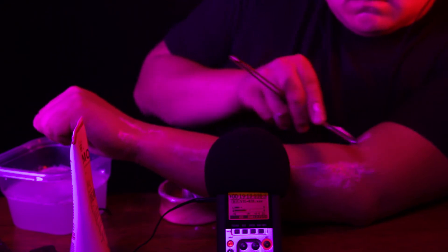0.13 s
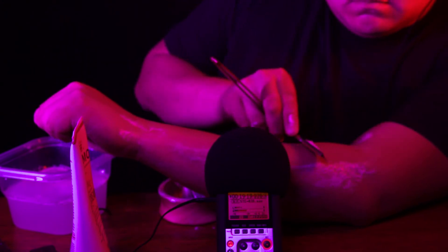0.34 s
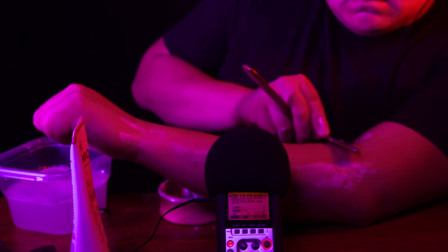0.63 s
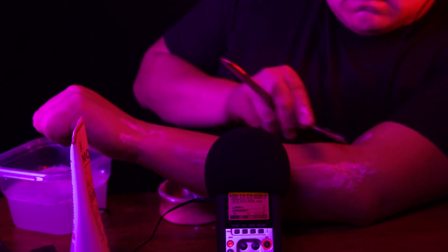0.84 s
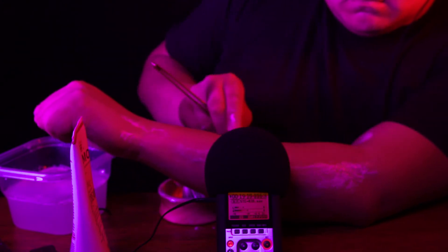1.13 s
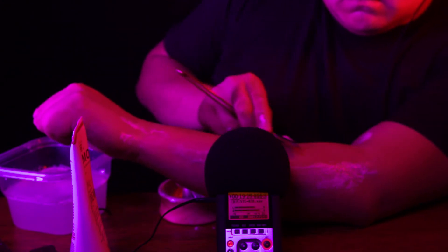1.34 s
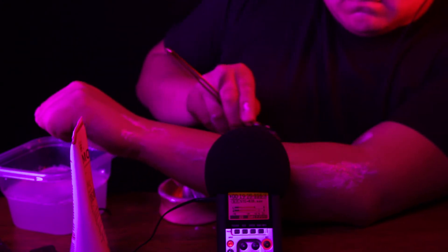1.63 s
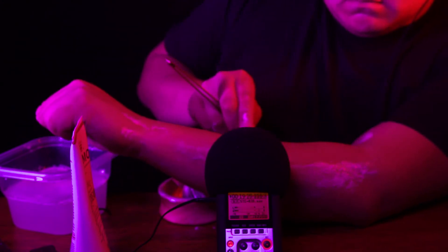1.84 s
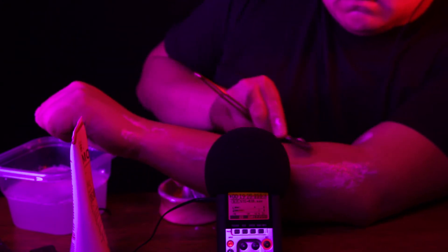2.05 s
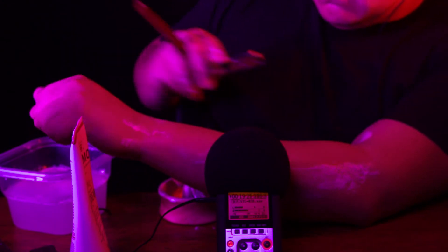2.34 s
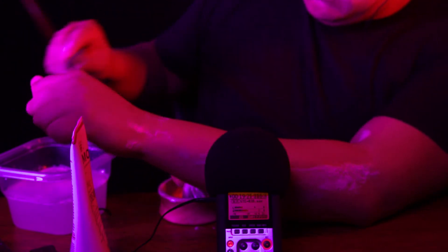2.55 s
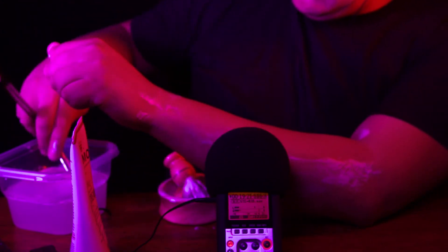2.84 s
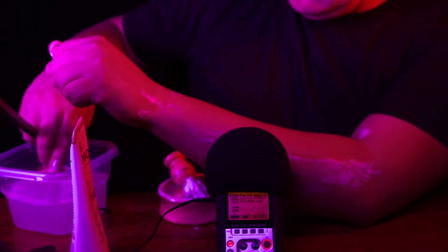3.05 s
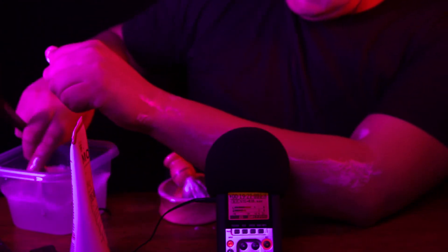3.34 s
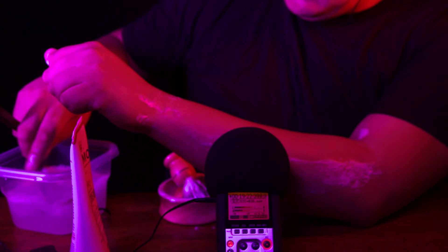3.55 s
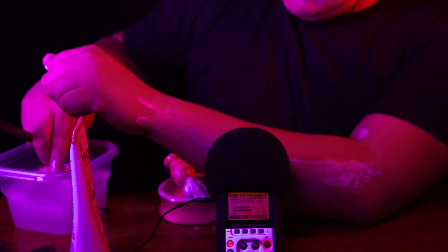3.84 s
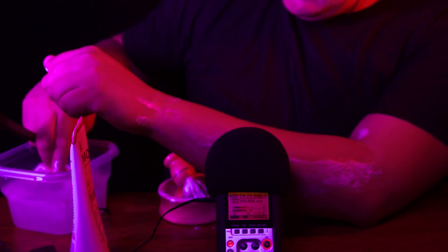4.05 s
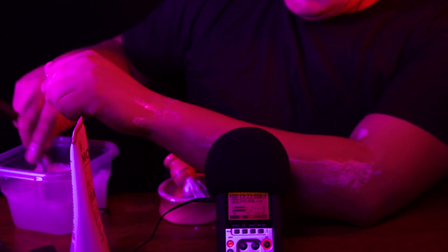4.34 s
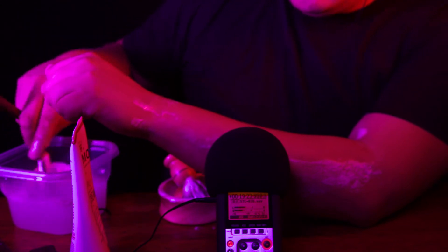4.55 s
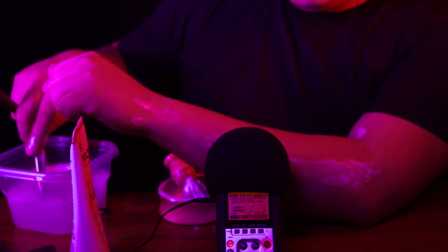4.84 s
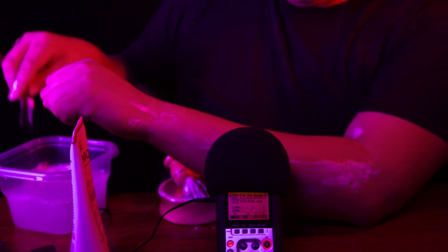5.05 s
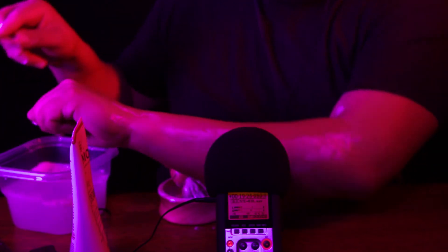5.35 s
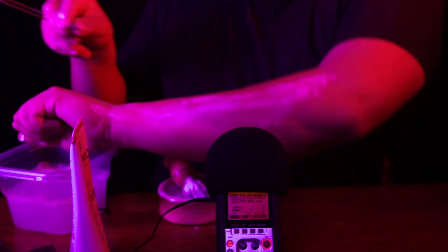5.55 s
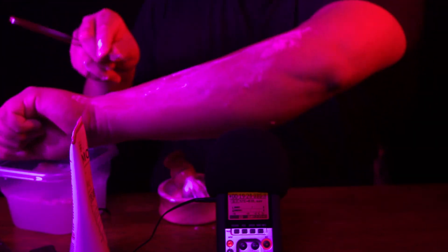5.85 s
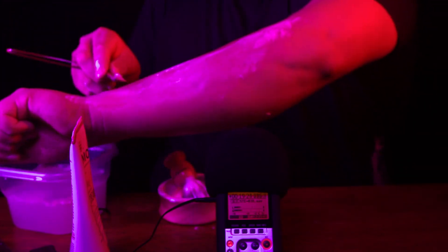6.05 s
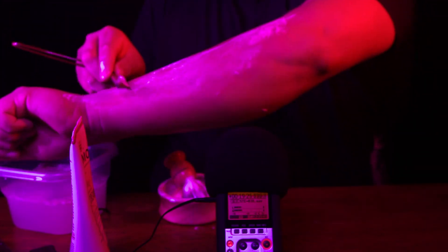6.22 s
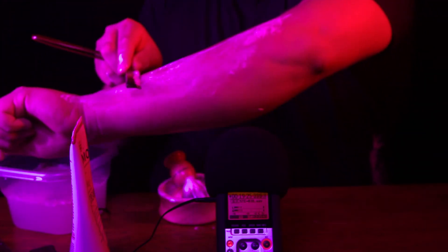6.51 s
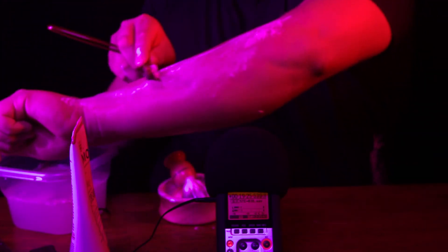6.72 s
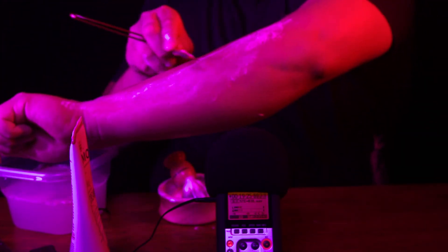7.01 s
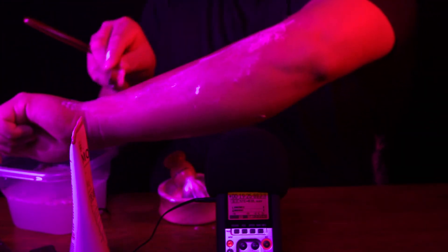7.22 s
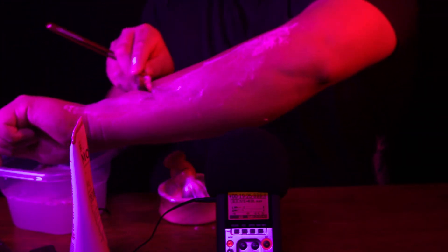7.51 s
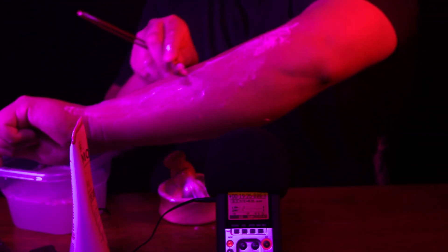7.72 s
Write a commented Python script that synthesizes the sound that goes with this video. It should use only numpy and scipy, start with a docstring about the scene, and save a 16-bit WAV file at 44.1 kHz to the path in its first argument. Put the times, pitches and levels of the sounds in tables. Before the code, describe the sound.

A quiet room with faint low rumble and hum, heard very close in wide stereo. A clipped razor rasp opens at 0 s on the right; fuller crisp strokes follow around 0.5-0.8 s, with sharp hair snaps. At 1.1 s a hand bumps the recorder: a fluttering low thud with dull foam rubbing, lasting about 0.15 s, then a short scrape at 1.25. Two strokes crackle at 1.9-2.1. A faint rub and soft handle scuff fill 2.3-2.75. From 3.05 the blade is rinsed in a tub at left: deep rising plops, splashes and spray, strongest at 3.05 and 3.4-3.6, with hollow table thumps. Smaller blips continue to 4.65, dwindling to drips by 5.2. Soft handle taps come at 5.27, 5.55, 5.98 and 6.2. Thin, bright scrapes resume left at 6.45, swelling near 6.9; a small tap at 6.99, a pause, then quick strokes from 7.43 to 7.9.

```python
"""On a wooden table in a quiet, low-humming room, a straight razor shaves a forearm beside a stereo recorder.
Cut hairs are random impulses and skin drag is filtered noise, both under contact envelopes. A hand bumps the
recorder, ringing its body modes. The blade is rinsed in a plastic tub on the left: bubbles are rising sines,
splashes are bands of noise, and thumps ring table modes. Fingers rub and shift the handle with short noises."""
import sys
import numpy as np
from scipy import signal
from scipy.fft import rfft, irfft, next_fast_len
from scipy.io import wavfile

SR = 44100
rng = np.random.default_rng(int(sys.argv[2]) if len(sys.argv) > 2 else 0)


def bounce(signal):
    """Save signal as a 16-bit WAV file at the path given by the first command-line argument."""
    frames = np.transpose(np.atleast_2d(signal))
    limited = np.clip(frames, -1, 1)
    pcm = np.round(limited * 32767).astype(np.int16)
    wavfile.write(sys.argv[1], SR, pcm)


N = 347508
TIME = np.arange(N) / SR

# Background noise spectrum. Each row: frequency in Hz, relative level in dB.
AIR_SPECTRUM = [(12, -56.5), (20, -27.5), (44, -4), (65, 0), (91, -18.5), (163, -12), (293, -26),
                (319, -31.5), (367, -30.5), (422, -33.5), (472, -33.5), (759, -44.5), (825, -33),
                (976, -53), (16000, -67)]
AIR_DB = -52
# Stereo correlation of the background. Each row: frequency in Hz, left-right likeness from -1 to 1.
AIR_LIKENESS = [(60, 0.046), (180, 0.28), (550, 0.24), (1650, 0.14), (4970, 0.053), (15000, 0.04)]
# Stereo balance of the background. Each row: frequency in Hz, left minus right in dB.
AIR_BALANCE = [(60, -3.5), (180, -1.5), (550, 0.5), (1650, -1.5), (4970, 0), (15000, 0.5)]
# Hum lines. Each row: centre in Hz on an axis shifted up by 1 Hz, width in Hz, level in dB, left-right likeness.
HUM_LINES = [(59.5, 8, -59, -.8), (119, 6, -70, .3), (156, 14, -68, .5), (808, 25, -87, -.6)]

# Bands of the room tail. Each row: centre in Hz, 60 dB decay time in seconds, level in dB.
ROOM_BANDS = [(298, 0.32, -6), (900, 0.32, -21), (2500, 0.14, -16), (6000, 0.2, -28.5), (12350, 0.3, -14.5)]
NEAR_T60_S, NEAR_DB = .008, -6   # close reflections from arm and table
TUB_T60_S, TUB_DB = 0.13, -7.5   # reflections from the tub walls
TUB_PAN_DB, PAN_DB_PER_OCTAVE = 7, 3   # left minus right at 1 kHz, and its growth with frequency
CUTOFF_HZ = 16150

# Sliding contact: loss in dB at the start, at the end, and the added drop at both ends
SWELL_DB, SAG_DB, EDGE_DB = 12, 13, 39
LAND_POWER, LIFT_POWER = 8.6, 3.88   # how abruptly it lands and lifts

# The tub thumps the table. Each row: start in seconds, strength in dB.
THUMPS = [(3.419, -15), (3.590, -11.5), (3.697, -28.5), (3.874, -45.5), (4.111, -22.5), (4.636, -34.5),
          (5.974, -38.5)]
# Table modes, the two board modes first. Each row: frequency in Hz, relative level in dB, 60 dB decay in seconds.
TABLE_MODES = [(190.5, 5, 0.14), (202.3, 2.5, 0.091), (83.4, -20, 0.36), (285, -17, 0.096),
               (396, -16, 0.062), (495.3, -20, .05)]
THUMP_DELAY_S = 0.012   # the board answers a little after the tub floor
BUZZ_HZ, BUZZ_T60_S, BUZZ_DB = 458.6, 0.42, -39.5   # rough shudder of the tub after each thump

# Jolts to the recorder. Each row: start in seconds, left strength in dB, right strength in dB.
JOLTS = [(1.113, -19, 3.5), (1.121, 1.5, -31), (1.133, -29, 0.5), (1.147, -10.5, -9), (1.172, -9.5, -7.5),
         (1.187, -3, -6), (1.196, -8.5, -7), (1.215, -12, -21.5)]
# Recorder body modes. Each row: frequency in Hz, relative level in dB, 60 dB decay in seconds.
BODY_MODES = [(182.4, -1, 0.099), (126.1, -8, 0.15), (69.2, -10.5, 0.11), (373, -34.5, 0.061),
              (517, -29, .05)]
# The recorder rocks on its foot: start in seconds, frequency in Hz, 60 dB decay in seconds,
# left strength in dB, right strength in dB.
ROCK = (1.108, 35, .2, -15, -7)
# Hand on the foam cover. Each row: start, rise and fall in seconds, level in dB,
# scratch relative to the dull rub in dB, left minus right in dB.
RUBS = [(1.11, .006, 0.054, -21, -21, -2.5), (1.139, 0.069, 0.037, -26.5, -18, -6.5)]
# Spectrum of the dull rub. Each row: frequency in Hz, relative level in dB.
RUB_SPECTRUM = [(140, -32), (230, -5.5), (343, -8.5), (397, -6), (495, -17), (538, -14), (1200, -50),
                (1560, -69), (2640, -120)]
# Spectrum of the scratch. Each row: frequency in Hz, relative level in dB.
SCRATCH_SPECTRUM = [(530, -23.5), (900, -2), (1500, -12), (1870, -14), (2090, -9.5), (4000, -41.5),
                    (5200, -73), (8800, -120)]
# Thin rustle of the cover: start, rise and fall in seconds, level in dB, left minus right in dB.
RUSTLE = (1.106, .012, .12, -68, -20)

# Soft rubs of fingers and sleeve. Each row: start, rise and fall in seconds, level in dB,
# squeak relative to the dull part in dB, left minus right in dB.
SLIDES = [(0.239, 0.092, 0.024, -82, -12, -5), (2.298, 0.22, 0.079, -77.5, -22.5, -6.5),
          (5.955, 0.051, 0.081, -73, -2, 23.5), (6.329, 0.041, 0.09, -80, -5, 19)]

# The handle shifts in the fingers. Each row: start in seconds, level in dB, centre in Hz, length in seconds,
# bright tick relative in dB, left minus right in dB.
TAPS = [(2.709, -52, 1300, 0.052, -43, 1), (5.266, -60.5, 1290, .025, -4.5, -16.5),
        (5.554, -47.5, 1064, 0.055, -39.5, 3.5), (5.976, -61, 1830, 0.03, -14, 18),
        (6.207, -51.5, 1904, 0.066, -27.5, 3), (6.99, -60.5, 900, 0.015, -34, -3)]
# Handle modes. Each row: frequency in Hz, relative level in dB, 60 dB decay in seconds.
HANDLE_MODES = [(900, 3.5, 0.0073), (1360, 2.5, 0.0067), (2120, -9, 0.035), (2940, 0.5, 0.012),
                (4060, -0.5, 0.013)]
HANDLE_CUT_HZ = 3300   # fingers damp the handle above this

# Bubbles and drops. Each row: start in seconds, level in dB, start pitch in Hz, 60 dB decay in seconds,
# initial rise in octaves per second.
BUBBLES = [(2.990, -68.5, 1880, 0.067, 3), (3.055, -16.5, 903, 0.079, 24), (3.070, -29, 1126, 0.045, 10.6),
           (3.127, -34.5, 767, 0.052, 4.4), (3.169, -43, 984, .16, 6.3), (3.301, -56, 1145, 0.067, 2),
           (3.325, -37.5, 943, 0.068, 45), (3.357, -56, 3870, 0.026, 4.6), (3.362, -35.5, 1140, 0.02, 3.6),
           (3.363, -50.5, 1826, 0.089, 1.9), (3.435, -14, 802, 0.061, 33), (3.46, -38.5, 1840, 0.14, 1.5),
           (3.47, -28.5, 1250, 0.03, 4.9), (3.497, -52, 3056, 0.098, 2.4), (3.568, -30, 4500, 0.011, 3.3),
           (3.588, -23.5, 1026, 0.033, 3), (3.845, -53.5, 3670, 0.05, 1.3), (3.846, -56, 1460, 0.15, 3.2),
           (3.948, -26, 693, 0.026, 2), (3.95, -36.5, 2500, 0.042, 4.1), (3.966, -42, 780, 0.064, 25),
           (4.029, -37, 990, 0.037, 28), (4.112, -33, 1923, 0.028, 1.5), (4.149, -36.5, 1035, 0.059, 10),
           (4.224, -52.5, 3570, 0.028, 1.3), (4.238, -29, 838, 0.099, 10), (4.369, -59, 6100, .02, 1.5),
           (4.637, -45, 3140, 0.033, 3), (4.644, -32, 1064, 0.039, 32), (4.657, -37.5, 1376, 0.067, 4.5),
           (4.801, -41, 2526, 0.026, 1.8), (4.804, -55, 1546, 0.084, 1.13), (4.842, -50, 3820, 0.024, 4.6),
           (4.922, -58, 1575, 0.089, 1.75), (4.996, -54, 5070, 0.026, 2.1), (5.032, -55, 2195, 0.035, 2.5),
           (5.060, -58, 5380, 0.025, 3.4), (5.170, -50.5, 1314, 0.045, 1.4)]
WOBBLE = .06   # rms share by which a bubble's pitch comes to tremble in moving water
# Splashes. Each row: start in seconds, crack level in dB, crack centre in Hz, spray level in dB, spray centre in Hz.
SPLASHES = [(3.055, -44.5, 2280, -47.5, 8080), (3.124, -41, 2650, -48.5, 5890),
            (3.151, -57, 2970, -64, 7680), (3.172, -54, 2850, -80, 6400), (3.205, -49, 3650, -54, 6590),
            (3.249, -67, 2980, -54.5, 10450), (3.309, -82, 2390, -76, 7080), (3.325, -61, 2550, -75, 7530),
            (3.36, -69, 1780, -90, 5850), (3.417, -33, 1050, -46.5, 6590), (3.476, -52, 1760, -59, 8690),
            (3.525, -65, 2760, -57, 11410), (3.586, -29, 1274, -38, 5780), (3.614, -73, 2200, -48.5, 8170),
            (3.665, -78, 2340, -67, 6670), (3.695, -38.5, 1760, -50.5, 5860),
            (3.715, -59.5, 2940, -47.5, 9100), (3.743, -78, 2400, -62.5, 7890),
            (3.812, -49, 2070, -72, 8630), (3.847, -67, 2800, -91, 7570), (3.871, -60.5, 2480, -79, 10300),
            (3.951, -49.5, 2430, -74, 5750), (3.98, -51, 2540, -69, 5520), (4.02, -57, 2800, -60.5, 4710),
            (4.028, -44.5, 1846, -69, 5500), (4.11, -40.5, 1900, -53.5, 6200),
            (4.224, -65, 2810, -81, 5190), (4.237, -56.5, 1870, -73, 6200), (4.62, -59.5, 650, -95.5, 8660),
            (4.638, -57, 3430, -65, 8640), (4.798, -57, 2480, -67.5, 6850),
            (4.852, -62.5, 3860, -70.5, 5580), (4.919, -67, 2410, -55.5, 8140),
            (4.986, -88, 2380, -60.5, 12930), (5.032, -80, 2290, -74.5, 7840),
            (5.169, -66.5, 1312, -89.5, 6920)]
# Spectrum of the crack. Each row: frequency in Hz, relative level in dB.
CRACK_SPECTRUM = [(300, -15), (700, 14.5), (1500, 1), (4000, 0.5), (6000, -33), (12000, -52)]
# Spectrum of the bright spray. Each row: frequency in Hz, relative level in dB.
SPRAY_SPECTRUM = [(2000, -48), (4000, 1), (6500, -3.5), (10000, -6.5), (16000, -3)]
SPLASH_ATTACK_S, SPLASH_T60_S = .0012, .042
DROPLETS, DROPLET_DB = 10, -3.5   # pairs of tiny bubbles per splash, and their greatest level relative to it

# Razor strokes. Each row: start, rise and fall in seconds, stubble level in dB,
# skin drag relative to the stubble in dB, left minus right in dB.
STROKES = [(0.0, 0.0014, 0.053, -44.5, -7, -12.5), (.335, .015, 0.039, -86.5, -14, -19),
           (0.479, 0.092, 0.051, -47.5, -8, -15), (0.583, 0.069, 0.15, -44.5, -5.5, -13),
           (0.798, 0.037, 0.02, -72, -1, -23), (1.222, 0.052, 0.052, -47, -12, -6),
           (1.89, 0.039, 0.18, -45, -10, -8.5), (1.986, 0.13, 0.077, -39.5, -11, -13),
           (6.44, 0.029, 0.045, -60, -12.5, 13.5), (6.525, 0.029, 0.047, -83, -0.5, 8.5),
           (6.638, 0.053, 0.046, -60.5, -28.5, 11.5), (6.754, .04, .05, -59.5, -26, 12.5),
           (6.843, 0.055, 0.075, -53.5, -25, 8.5), (6.919, 0.08, 0.057, -42.5, -35.5, 3),
           (7.43, 0.026, 0.02, -62.5, -30.5, 18), (7.46, 0.035, 0.087, -62.5, -28.5, 18.5),
           (7.586, 0.032, 0.047, -70.5, -24.5, 16.5), (7.631, 0.053, 0.053, -51.5, -24, 10.5),
           (7.7, 0.059, 0.085, -55.5, -26.5, 9.5), (7.77, .1, .06, -47.5, -27.5, 6)]
# Spectrum of cut stubble. Each row: frequency in Hz, relative level in dB.
STUBBLE_SPECTRUM = [(1470, -54), (2500, -42.5), (3200, -28.5), (3900, -5.5), (5030, 4.5), (6110, 5),
                    (9360, 7), (12500, 1.5), (15200, -12.5), (16000, -28)]
# Spectrum of skin drag. Each row: frequency in Hz, relative level in dB.
SKIN_SPECTRUM = [(260, -56.5), (450, -17), (786, -5), (1460, -5), (1950, 2), (2400, -1.5), (2960, 4),
                 (4000, -3), (5200, -30.5), (8800, -120)]
# Single stiff hairs snapping. Each row: time in seconds, peak in dB before panning.
SNAPS = [(0.489, -50), (0.5536, -24.5), (0.5656, -25.5), (0.816, -51), (0.829, -41), (0.838, -48),
         (1.2575, -24.5), (1.905, -41.5), (2.044, -35), (2.0926, -36), (2.0964, -39.5), (6.4512, -43),
         (7.637, -37)]
HAIRS_PER_S, HAIR_SPREAD_DB = 3000, 4
HAIR_SPLIT_HZ, FINE_DB = 8100, 1   # thick hairs click below, fine ones above; fine relative to thick
EDGE_LAG_S = .00015   # lag between neighbouring spots along the edge
DRAG_POWER = 1.23   # skin drag fades sooner than the stubble as pressure eases
LINGER_S, LINGER_DB = .2, -44   # faint hiss outlasting each stroke, relative to its level


def from_db(db):
    """Decibels are a logarithmic measure of amplitude ratio."""
    return 10 ** (np.asarray(db) / 20)


def rms_one(x):
    """Dividing by the root mean square gives unit effective amplitude."""
    return x / np.sqrt(np.mean(x ** 2) + 1e-20)


def at_hz(points, hz):
    """A spectrum is interpolated linearly on a logarithmic frequency axis."""
    points = np.array(points)
    return np.interp(np.log(hz), np.log(points[:, 0]), points[:, 1])


def colour(x, spectrum):
    """Minimum-phase filtering shapes a spectrum yet keeps clicks causal; the result has unit rms."""
    size = x.shape[-1]
    hz = np.fft.rfftfreq(4096, 1 / SR) + 1
    cepstrum = irfft(at_hz(spectrum, hz) * np.log(10) / 20)
    cepstrum[1:2048] *= 2   # folding the cepstrum gives minimum phase
    taps = irfft(np.exp(rfft(cepstrum * (np.arange(4096) <= 2048))))
    taps = taps.reshape((1,) * (x.ndim - 1) + (-1,))
    return rms_one(signal.fftconvolve(x, taps, axes=-1)[..., :size])


def band(x, hz, octaves):
    """A broad resonance passes a band around its centre; the result has unit rms."""
    edges = [hz / 2 ** (octaves / 2), min(hz * 2 ** (octaves / 2), SR * .45)]
    return rms_one(signal.sosfilt(signal.butter(1, edges, "band", fs=SR, output="sos"), x))


def band_twice(x, hz, first, second):
    """Two resonances in cascade, with widths in octaves, steepen the skirts."""
    return band(band(x, hz, octaves=first), hz, octaves=second)


def panned(x, pan_db):
    """A level difference between the channels places a sound sideways."""
    return np.array([x * from_db(pan_db / 2), x * from_db(-pan_db / 2)])


def spread(mid, side, alike):
    """Weighted sum and difference of two independent noises set the correlation of left and right."""
    alike = np.clip(alike, -1, 1)
    return np.sqrt(1 + alike) * mid + np.sqrt(1 - alike) * side * [[1], [-1]]


def pair(alike):
    """A stereo noise has a chosen left-right correlation."""
    mid, side = rng.standard_normal((2, N))
    return spread(mid, side, alike)


def add(out, s, sound):
    """Sounds superpose: a short one is summed in at time s."""
    i = round(s * SR)
    out[:, i:i + sound.shape[1]] += sound[:, :N - i]


def ring(clicks, modes):
    """Impulses excite each mode of a body as an exponentially decaying sine."""
    out = 0
    for hz, level_db, t60 in modes:
        radius, angle = from_db(-60 / (t60 * SR)), 2 * np.pi * hz / SR
        poles = [1, -2 * radius * np.cos(angle), radius * radius]
        out = out + from_db(level_db) * signal.lfilter([0, np.sin(angle)], poles, clicks + 1e-18)
    return out


def tail(t60):
    """Diffuse reflections are decaying noise, here of unit energy and at most a quarter second long."""
    t = TIME[:round(t60 * SR) + 1]
    burst = rng.standard_normal((2, SR // 4))[:, :len(t)] * from_db(-60 * t[:SR // 4] / t60)
    return burst / np.sqrt(np.sum(burst ** 2, axis=1, keepdims=True))


def scatter(x, t60, level_db):
    """Close reflections, drawn afresh and unlike in each channel, follow the direct sound."""
    response = from_db(level_db) * tail(t60)
    response[:, 0] += 1
    return signal.fftconvolve(x, response, axes=1)


def contact(s, rise, fall, level_db):
    """Friction follows pressure and speed: a contact lands, swells, sags and lifts; gives samples and gain."""
    on = slice(round(s * SR), min(round((s + rise + fall) * SR), N))
    t = TIME[on] - s - rise
    before, after = np.clip(-t / rise, 0, 1), np.clip(t / fall, 0, 1)
    edges = EDGE_DB * (before ** LAND_POWER + after ** LIFT_POWER)
    return on, from_db(level_db - SWELL_DB * before - SAG_DB * after - edges)


def background():
    """Random air noise gives rumble and hiss; narrow noise bands waver as the hum of distant machines."""
    size = next_fast_len(N)
    hz = np.fft.rfftfreq(size, 1 / SR) + 1   # the shift keeps the logarithm finite
    mid, side = rfft(rng.standard_normal((2, size)))
    both = spread(mid, side, at_hz(AIR_LIKENESS, hz))
    shape = panned(from_db(at_hz(AIR_SPECTRUM, hz)), at_hz(AIR_BALANCE, hz))
    out = from_db(AIR_DB) * rms_one(irfft(both * shape, size))
    for line_hz, width_hz, level_db, likeness in HUM_LINES:
        peak = 1 / (1 + (2 * (hz - line_hz) / width_hz) ** 2)
        out += from_db(level_db) * rms_one(irfft(rfft(pair(likeness), size) * peak, size))
    return out[:, :N]


def room(x):
    """Reverberation is a short diffuse tail whose decay time depends on frequency."""
    response = np.zeros((2, SR // 4))
    for hz, t60, level_db in ROOM_BANDS:
        edges = [hz / 1.6, min(hz * 1.6, SR * .45)]
        octave = signal.butter(1, edges, "band", fs=SR, output="sos")
        add(response, 0, from_db(level_db) * signal.sosfilt(octave, tail(t60)))
    source = 0.52 * x + 0.47 * x[::-1]   # walls mix the two sides
    return x + signal.fftconvolve(source, response, axes=1)[:, :N]


def table():
    """Modes beat: the tub floor knocks at once, then two close board modes start opposed, swell and cancel."""
    push = np.zeros(N)
    for s, level_db in THUMPS:
        push[round(s * SR)] = from_db(level_db)
    soft = signal.lfilter([.05], [1, -.95], push)
    opposed = ring(soft, TABLE_MODES[:1]) - ring(soft, TABLE_MODES[1:2])
    board = np.roll(opposed, round(THUMP_DELAY_S * SR))
    buzz = band_twice(tail(BUZZ_T60_S), BUZZ_HZ, 1.3, 1.3)
    shudder = from_db(BUZZ_DB) * signal.fftconvolve(push[None], buzz, axes=1)
    return panned(board + ring(soft, TABLE_MODES[2:]), -5.0) + shudder[:, :N]


def bump():
    """Impulses excite body modes, the low ones opposed in the two capsules, as the foam cover rubs."""
    push, rock, rub = np.zeros((3, 2, N))
    for s, left_db, right_db in JOLTS:
        push[:, round(s * SR)] = from_db([left_db, right_db])
    soft = signal.lfilter([.01], [1, -1.8, .81], push)
    rock_s, rock_hz, rock_t60, left_db, right_db = ROCK
    rock[:, round(rock_s * SR)] = from_db([left_db, right_db])
    rocking = ring(signal.lfilter([.02], [1, -.98], rock), [(rock_hz, 0, rock_t60)])
    low = ring(soft, BODY_MODES[1:3]) + rocking

    noise = rng.standard_normal((2, 2, SR // 2))
    dull, scratch = np.zeros((2, 2, N))
    add(dull, rock_s - .1, colour(noise[0], RUB_SPECTRUM))
    add(scratch, rock_s - .1, colour(noise[1], SCRATCH_SPECTRUM))
    for s, rise, fall, level_db, scratch_db, pan_db in RUBS:
        on, gain = contact(s, rise, fall, level_db)
        mix = dull[:, on] + from_db(scratch_db) * scratch[:, on]
        rub[:, on] += mix * panned(gain, pan_db)
    on, gain = contact(*RUSTLE[:4])
    rustle = band(rng.standard_normal(SR // 2), 8000, octaves=1.8)[:gain.size]
    rub[:, on] += panned(gain * rustle, RUSTLE[4])
    return ring(soft, BODY_MODES[:1] + BODY_MODES[3:]) + low * [[-1], [1]] + rub


def fingers():
    """Soft friction is grainy noise in a dull band, with a thin squeak band above."""
    out = np.zeros((2, N))
    for s, rise, fall, level_db, squeak_db, pan_db in SLIDES:
        on, gain = contact(s, rise, fall, level_db)
        grains = from_db(3.6 * rng.exponential(1, gain.size)) * rng.standard_normal(gain.size)
        dull, squeak = [band_twice(grains, hz, 0.63, 0.54) for hz in (2100, 6500)]
        out[:, on] = panned(gain * (dull + from_db(squeak_db) * squeak), pan_db)
    return out


def handle():
    """Friction noise excites damped modes: a short scuff holds its strength, then stops."""
    out, t = np.zeros((2, N)), TIME[:SR // 6]
    damping = signal.butter(4, HANDLE_CUT_HZ, fs=SR, output="sos")
    for s, level_db, hz, length, tick_db, pan_db in TAPS:
        noise = rng.standard_normal(len(t))
        scuff = noise + 0.32 * rms_one(ring(noise, HANDLE_MODES))
        dull = signal.sosfilt(damping, band_twice(scuff, hz, 1.83, 2.55))
        tick = from_db(tick_db) * np.diff(noise, prepend=0)
        decay = from_db(level_db - 12 * t / length - 16.6 * (t / length) ** 3.25)
        shape = decay * np.minimum(t / (0.026 * length), 1)
        add(out, s, scatter(panned(shape * (dull + tick), pan_db), NEAR_T60_S, NEAR_DB))
    return out


def bubble(peak_db, hz, t60, rise, size=SR // 6):
    """A bubble is a damped oscillator whose pitch rises, by up to half an octave, as it nears the surface."""
    t = TIME[:size]
    tremble = rms_one(signal.lfilter([1], [1, -.97], rng.standard_normal(len(t))))
    glide = hz * 2 ** (.5 * np.tanh(2 * rise * t))
    pitch = glide * (1 + WOBBLE * tremble * np.minimum(t * hz / 10, 1))   # trembling grows over ten cycles
    envelope = from_db(peak_db - 60 * t / t60) * np.minimum(t / 0.0011, 1)
    return np.sin(2 * np.pi * np.cumsum(pitch) / SR) * envelope


def from_tub(x, hz):
    """Wall reflections blur a sound on the left; the capsules part high sounds more."""
    pan_db = TUB_PAN_DB + PAN_DB_PER_OCTAVE * np.log2(hz / 1000)
    return scatter(panned(x, pan_db), TUB_T60_S, TUB_DB)


def water():
    """Bubbles resonate as plops; a splash is a band-limited crack, bright spray and tiny bubbles."""
    out, t = np.zeros((2, N)), TIME[:SR // 6]
    for s, peak_db, hz, t60, rise in BUBBLES:
        add(out, s, from_tub(bubble(peak_db, hz, t60, rise), hz))
    grains = from_db(2.46 * rng.exponential(1, (2, N))) * rng.standard_normal((2, N))
    cracks, sprays = colour(grains[0], CRACK_SPECTRUM), colour(grains[1], SPRAY_SPECTRUM)
    dying = from_db(-60 * (t / SPLASH_T60_S) ** 1.07) * np.minimum(t / SPLASH_ATTACK_S, 1)
    for s, crack_db, hz, spray_db, spray_hz in SPLASHES:
        at = round(s * SR) + np.arange(len(t))
        crack = band_twice(cracks[at], hz, 1.5, 1.5)
        spray = band_twice(sprays[at], spray_hz, 1.5, 1.5)
        splash = (from_db(crack_db) * crack + from_db(spray_db) * spray) * dying
        for late, size, fine in rng.random((DROPLETS, 3)):   # later droplets are weaker
            low_hz, high_hz = hz * 2 ** (2.0 * size - .6), spray_hz * 2 ** (1.7 * fine - 1.1)
            drop = bubble(crack_db + DROPLET_DB - 13 * late, low_hz, 0.02, 4.2, size=1600)
            drop += bubble(spray_db + DROPLET_DB - 11 * late, high_hz, 0.016, 5.3, size=1600)
            lag = round(late * SPLASH_T60_S * 1.5 * SR)
            splash[lag:lag + 1600] += drop[:len(t) - lag]
        add(out, s, from_tub(splash, hz))
    return out


def hairs():
    """Random impulses of uneven strength arise at three spots on the edge, each with its own lag at the left."""
    sizes = from_db(HAIR_SPREAD_DB * np.minimum(rng.exponential(1, N), 5)) * rng.choice([-1, 1], N)
    cuts = sizes * (rng.random(N) < HAIRS_PER_S / SR)
    spot = rng.integers(-1, 2, N)
    left = sum(np.roll(cuts * (spot == k), round(k * EDGE_LAG_S * SR)) for k in (-1, 0, 1))
    return rms_one(np.array([left, cuts]))


def razor():
    """Dense random impulses of cut hairs merge into a rasp over the friction of an edge on wet skin."""
    shared = hairs()
    low, high = [signal.butter(3, HAIR_SPLIT_HZ, kind, fs=SR, output="sos") for kind in ("low", "high")]
    # sounds common to all layers tie them together; fine hairs are the least alike
    thick = rms_one(signal.sosfilt(low, colour(shared + 0.64 * hairs(), STUBBLE_SPECTRUM)))
    fine = rms_one(signal.sosfilt(high, colour(shared + 2.5 * hairs(), STUBBLE_SPECTRUM)))
    drag = colour(shared + 0.41 * pair(1.0), SKIN_SPECTRUM)
    hiss = colour(pair(0.35), STUBBLE_SPECTRUM)

    snaps, snap = np.zeros((1, N)), colour(signal.unit_impulse(400), STUBBLE_SPECTRUM)
    for s, peak_db in SNAPS:
        add(snaps, s, from_db(peak_db) * snap[None] / np.abs(snap).max())
    # each snap takes the position of the latest stroke begun
    owner = np.searchsorted([row[0] for row in STROKES], TIME, "right") - 1

    out = np.zeros((2, N))
    for k, (s, rise, fall, level_db, drag_db, pan_db) in enumerate(STROKES):
        on, gain = contact(s, rise, fall, level_db)
        easing = (gain / from_db(level_db)) ** (DRAG_POWER - 1)
        stubble = thick[:, on] + from_db(FINE_DB) * fine[:, on]
        mix = stubble + from_db(drag_db) * easing * drag[:, on]
        stroke = panned(gain, pan_db) * mix + panned(snaps[0, on] * (owner[on] == k), pan_db)
        add(out, s, scatter(stroke, NEAR_T60_S, NEAR_DB))
        # a faint hiss holds nearly even from the stroke's peak, then drops
        after = slice(round((s + rise) * SR), round((s + rise + fall + LINGER_S) * SR))
        progress = (TIME[after] - s - rise) / (fall + LINGER_S)
        faint = from_db(level_db + LINGER_DB - 20 * progress ** 8)
        out[:, after] += panned(faint, pan_db / 2) * hiss[:, after]
    return out


def scene():
    """Airborne sound excites the room; vibration of table and body reaches the capsules directly."""
    airborne = fingers() + handle() + water() + razor()
    return background() + table() + bump() + room(airborne)


def record(dry):
    """Saturation rounds the loudest peaks and a steep low-pass filter removes the top."""
    rounded = 1.162 * np.tanh(dry / 1.343)
    return signal.sosfilt(signal.cheby2(12, 70, CUTOFF_HZ, fs=SR, output="sos"), rounded)


dry = scene()
out = record(dry)
bounce(out)
```